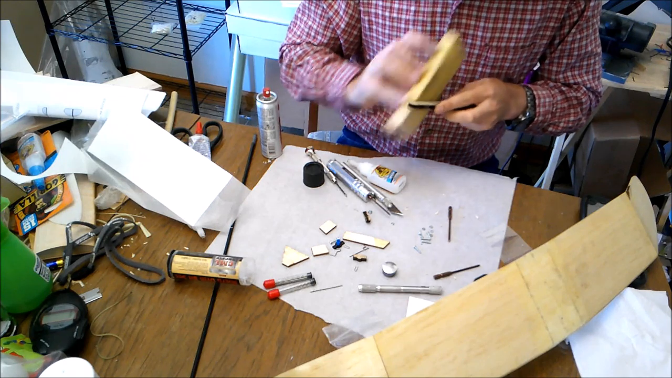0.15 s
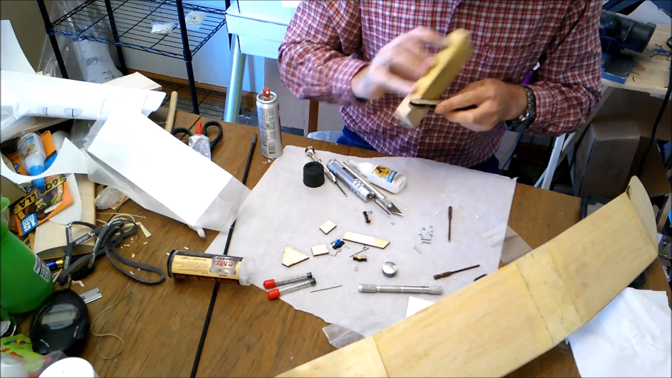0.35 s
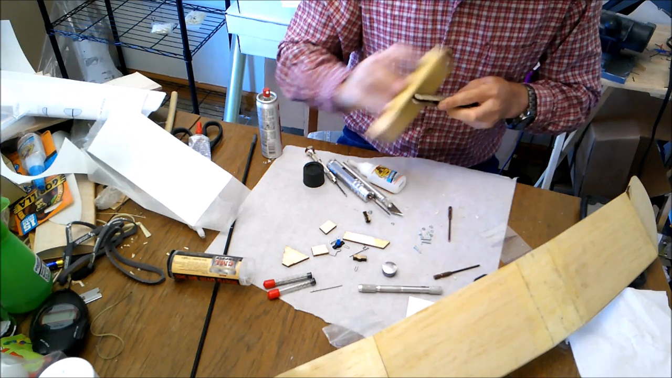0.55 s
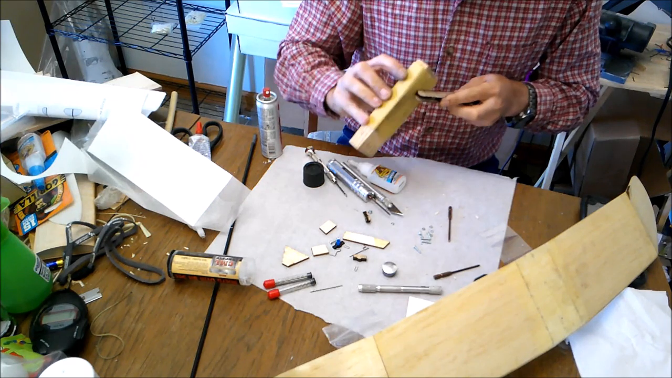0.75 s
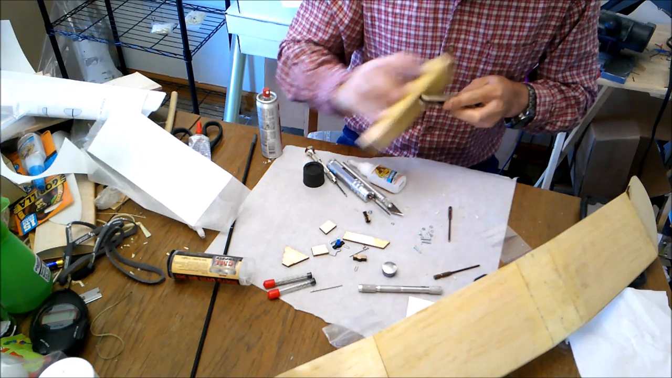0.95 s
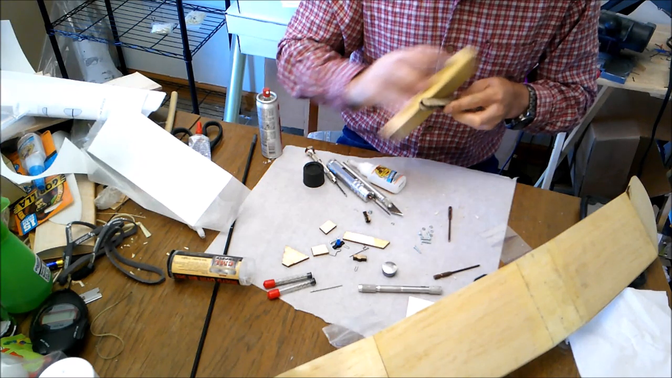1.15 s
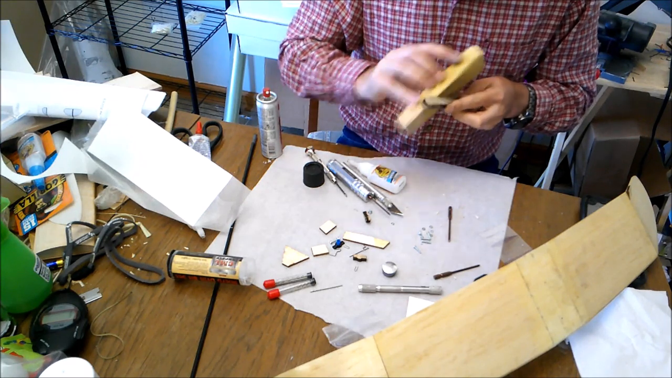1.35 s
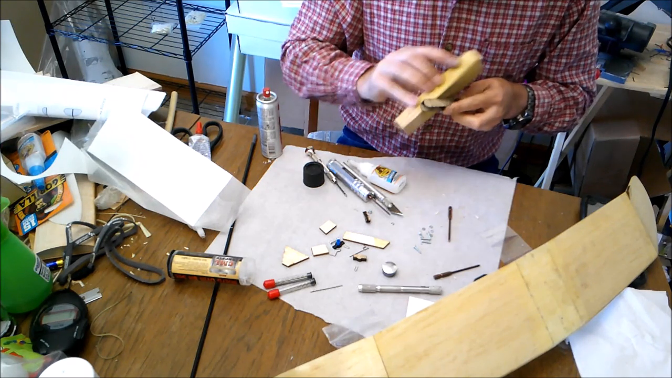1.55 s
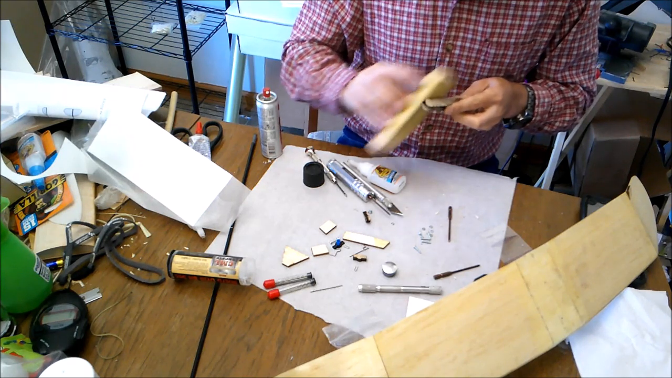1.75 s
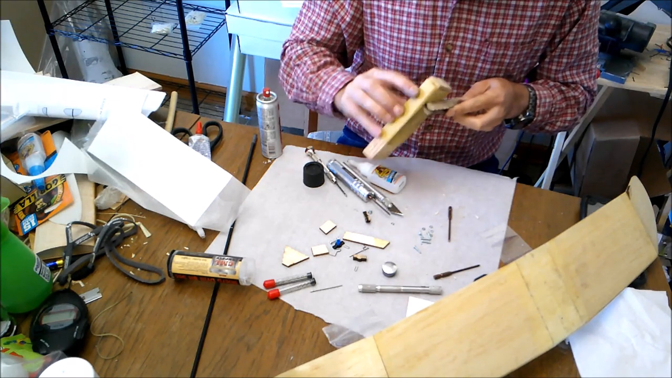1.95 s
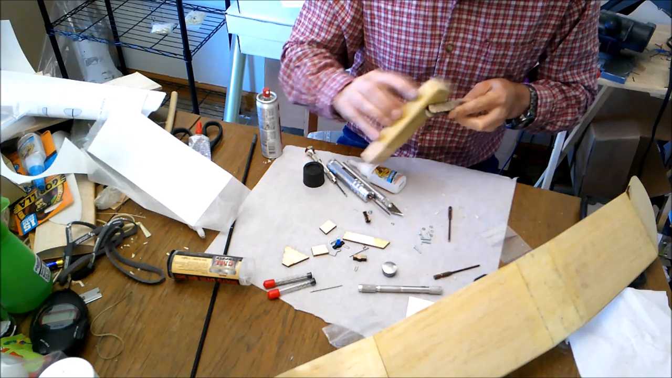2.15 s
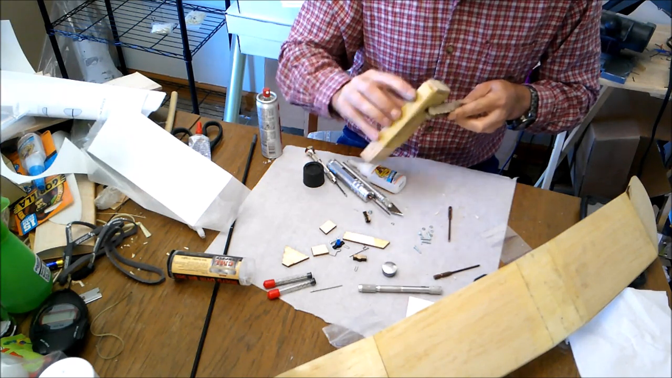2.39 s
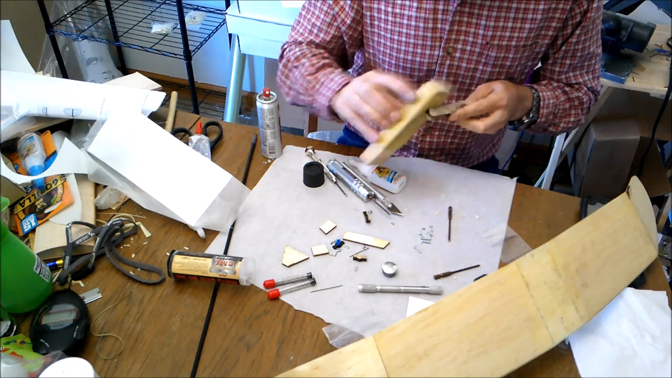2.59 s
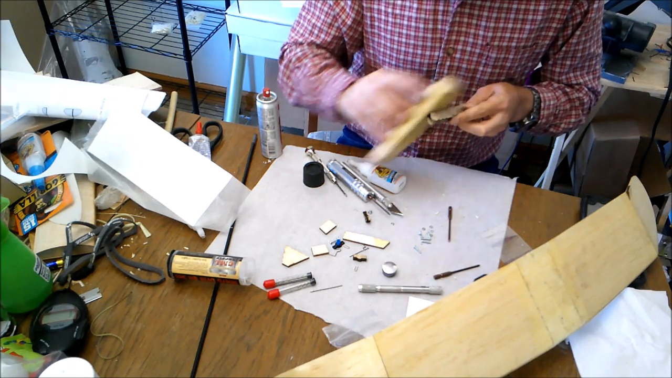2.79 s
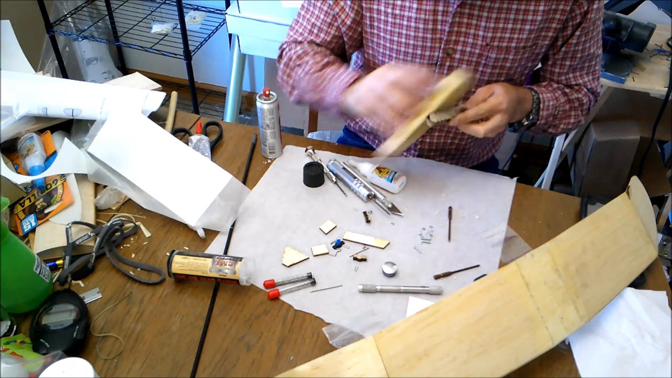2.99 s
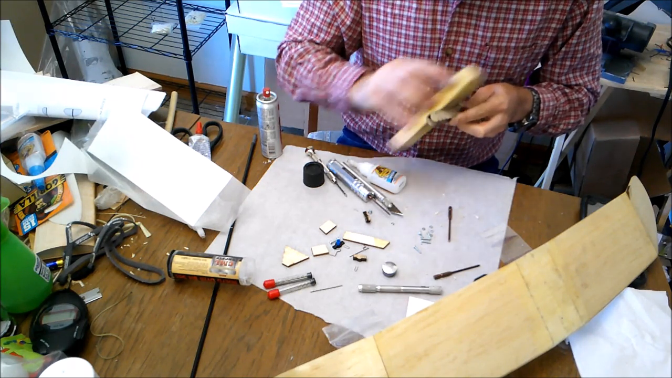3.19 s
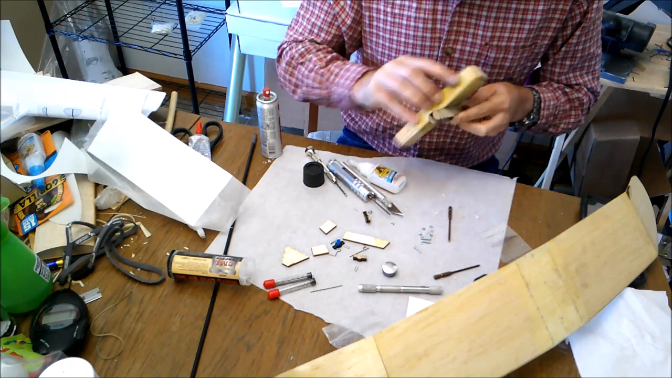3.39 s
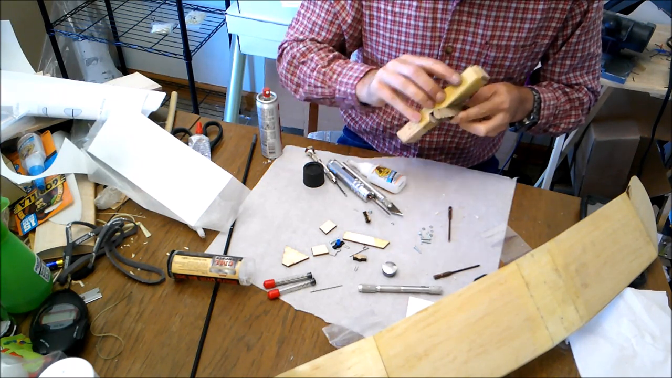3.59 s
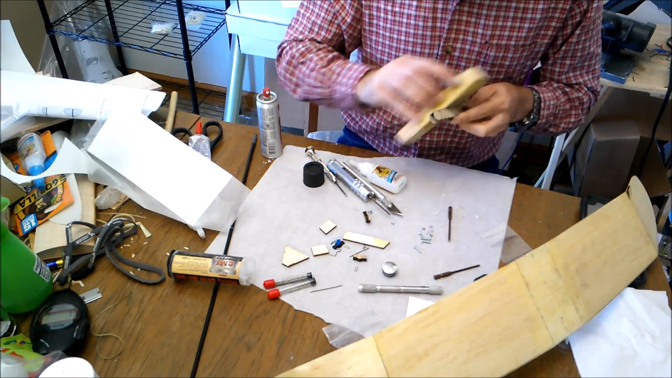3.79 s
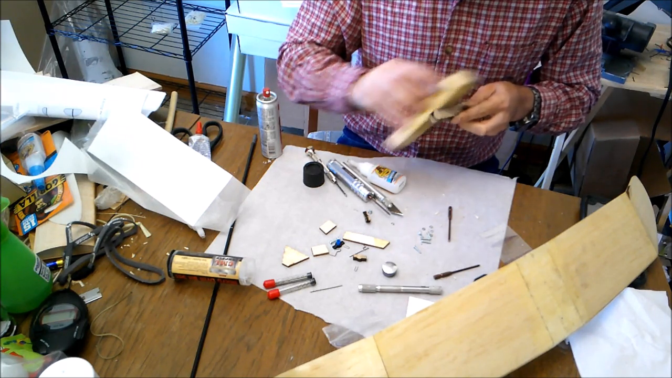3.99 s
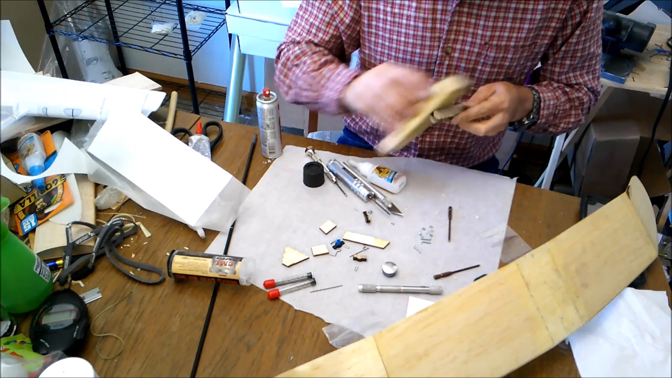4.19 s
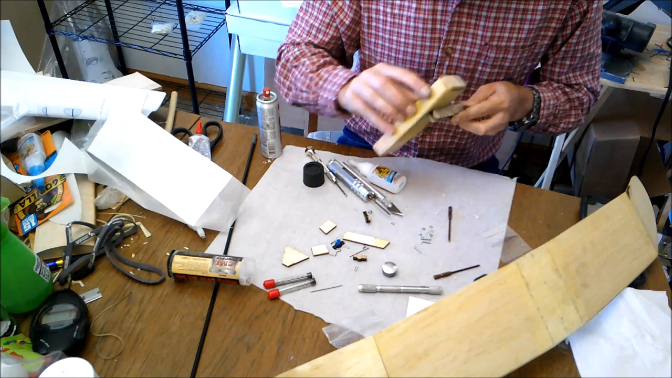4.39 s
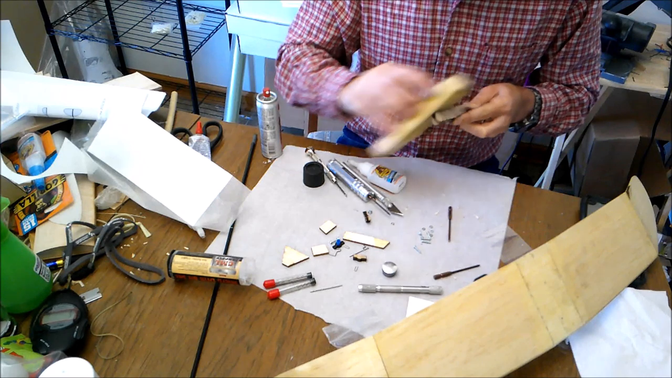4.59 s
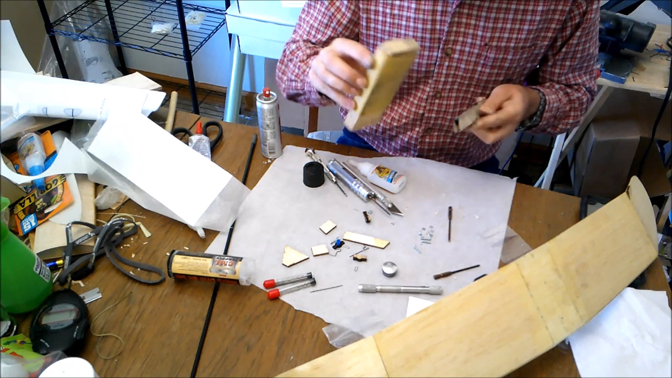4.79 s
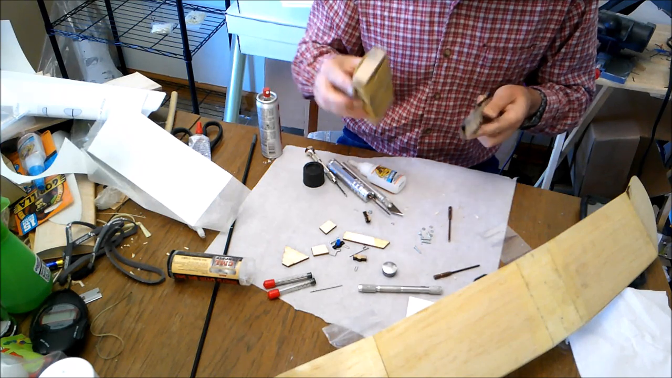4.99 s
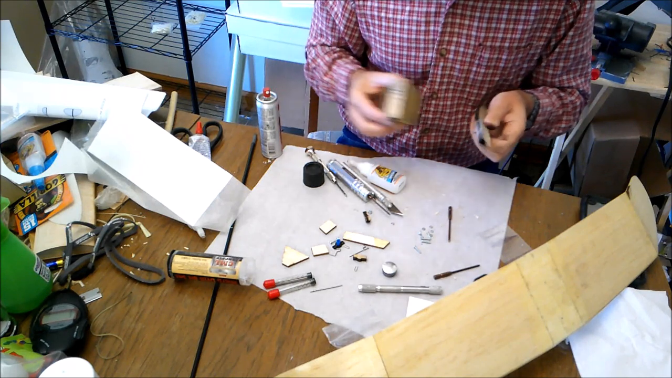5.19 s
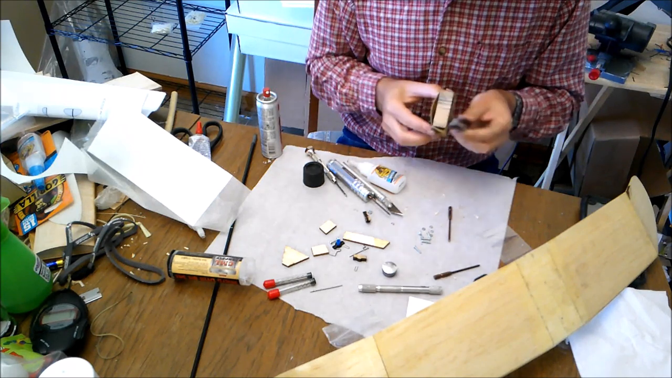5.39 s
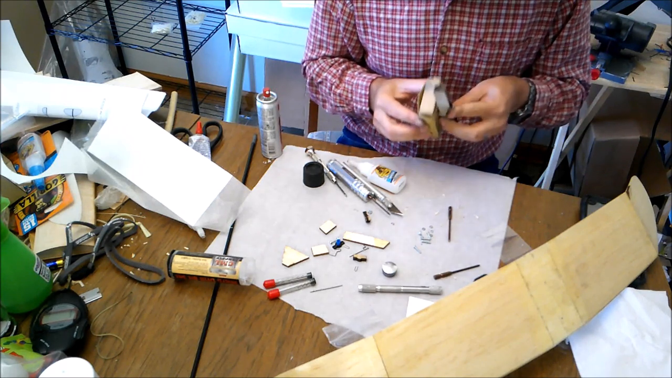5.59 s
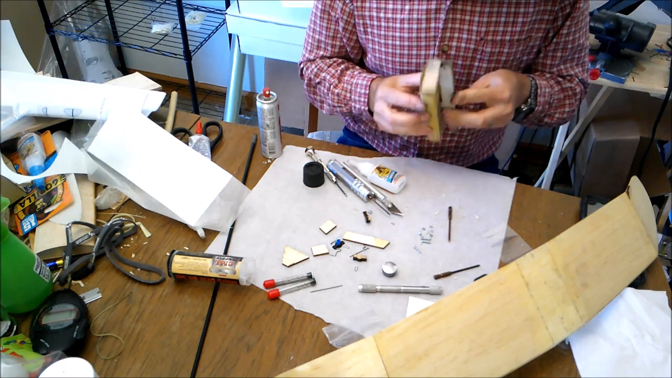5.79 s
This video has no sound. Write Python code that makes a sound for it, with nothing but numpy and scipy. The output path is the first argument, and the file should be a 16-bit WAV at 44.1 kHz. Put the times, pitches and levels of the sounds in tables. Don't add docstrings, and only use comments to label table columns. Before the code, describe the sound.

Fast dry sandpaper strokes rasp on a small wooden part for several seconds, then stop; light taps follow over faint room hum.

```python
import sys
import numpy as np
from scipy import signal
from scipy.fft import rfft, irfft, dct
from scipy.io import wavfile

SR = 44100
rng = np.random.default_rng(int(sys.argv[2]) if len(sys.argv) > 2 else 0)


def to_wav(s):
    ch = np.atleast_2d(s).T
    pcm = np.round(np.clip(ch, -1, 1) * 32767)
    wavfile.write(sys.argv[1], SR, pcm.astype(np.int16))


def natural_amplitude(level_db):
    exponent = np.asarray(level_db, float) / 20
    return 10 ** exponent


N = 257984
TIME = np.arange(N) / SR

# (start_s, length_s, pressure_db, lean_to_the_end_db, wood_body_db)
PUSHES = [(0.041, 0.08, -36.5, -0.5, -9.5), (0.293, 0.082, -38, -2.3, -7.5), (0.55, 0.083, -43, 1.5, -6),
          (0.8, 0.08, -39, -0.5, -7.5), (1.044, 0.074, -40, -0.8, -10.5), (1.275, 0.077, -42.5, 0.5, -5.5),
          (1.512, 0.067, -41, 1.2, -8.5), (1.738, 0.072, -43, -0.1, -5.5), (1.971, 0.066, -43.5, 0, -6.5),
          (2.19, 0.069, -42, -0.6, -7.5), (2.405, 0.068, -41, -1.4, -10), (2.624, 0.071, -42.5, -1.5, -7.7),
          (2.848, 0.071, -42.5, 0, -8), (3.06, 0.078, -44.5, -1, -7.2), (3.285, 0.065, -45.5, -2.2, -6.5),
          (3.507, 0.068, -44.5, -1, -8), (3.721, 0.076, -44.5, 0.5, -10.5),
          (3.949, 0.069, -44.5, -0.5, -9.5), (4.164, 0.08, -45.5, -1.5, -7.5), (4.4, 0.076, -48.5, 1, -8.5)]
# (start_s, length_s, pressure_db, lean_to_the_end_db, wood_body_db)
PULLS = [(0.168, 0.088, -42.5, -1.5, -4), (0.414, 0.09, -41.5, 2.5, -3.5), (0.681, 0.078, -42.5, 0, -7.5),
         (0.922, 0.084, -42.5, -1.5, -6.5), (1.162, 0.08, -44, -2, -8), (1.391, 0.076, -42, -0.9, -7),
         (1.622, 0.074, -41, -1, -7.2), (1.853, 0.075, -41.5, -1.5, -7.5), (2.079, 0.069, -42.5, 1, -7.5),
         (2.29, 0.082, -44, -1.8, -8), (2.51, 0.072, -42.5, -1.3, -7.5), (2.731, 0.072, -44, -1.9, -5.5),
         (2.953, 0.07, -44, -0.3, -8), (3.17, 0.076, -44.5, -0.5, -8), (3.388, 0.074, -46, 0.5, -6),
         (3.612, 0.073, -47.5, -0.5, -4.5), (3.832, 0.078, -45, 0.5, -7.5), (4.057, 0.075, -45.5, -3, -5),
         (4.275, 0.082, -49.5, -0.2, -5), (4.53, 0.098, -48.5, -1, -6)]
# (start_s, length_s, pressure_db, grit_fizz_db, wood_body_db)
TOUCHES = [
    (-.08, 0.1, -54, -1, -1.5),
    (5.38, 0.038, -62, -10.5, -9),
    (5.427, 0.038, -60, -8, -11),
    (5.481, 0.085, -56.5, -12, -14),
    (5.589, 0.016, -55, -22, 1.5),
    (5.625, .031, -63, -11, -7),
    (5.8, .1, -51, -13, -12),
]


def grit():
    # (pitch_hz, width_hz, level_over_rub_db)
    block_modes = [
        (634.5, 7.6, -12),
        (900, 22, -8),
        (1270, 89, -5),
        (1923, 530, 4),
        (2210, 190, -0.5),
        (2632, 110, -1.5),
        (2943, 250, 7.5),
        (3670, 710, -6.5),
        (5150, 440, -6.5),
        (6550, 660, -11),
    ]
    # (time_s, ring_db, ring_centre_hz, share_of_glide)
    grip = [(0, 6, 2440, -.6), (.45, 7, 2505, -0.71), (.6, 5.5, 2710, -0.16), (1, -2.5, 2700, .2),
            (1.4, -5.5, 2590, .3), (2, 5, 2790, .5), (2.4, 0, 2560, 0.94), (3.3, 1.5, 2750, 0.98),
            (3.8, 3, 2585, 1), (4.6, -3, 2640, 0.52), (5.4, 2.5, 2680, 0.38)]
    # (time_s, level_db, share_of_pitch)
    fingers = [(0, -0.5, 0.92), (.5, -4, 1.1), (1, 2, 0.84), (1.45, 0.5, 0.97), (1.85, 4, 0.89),
               (2.4, 3.5, 0.97), (2.9, 0.5, 1.05), (3.5, -1.5, 1.05), (3.85, 5.5, 1.15), (4.1, 2, 1.15),
               (4.6, 0, 1.05), (5.4, -1, 1.1)]

    coarse = ticks(per_s=9000, spread_db=2.0, chatter_db=-0.03, clump_db=0.96)
    dust = ticks(per_s=7700, spread_db=-1.0, chatter_db=-1.3, clump_db=1.5)
    hz = np.fft.rfftfreq(N, 1 / SR)
    dust_share = 1 / (1 + (5700 / (hz + 1)) ** 12)
    rub = irfft(rfft(coarse) * (1 - dust_share) + rfft(dust) * dust_share, N)

    rings = np.zeros(N)
    for mode_hz, width_hz, level_db in block_modes:
        drifting_hz = mode_hz * (1 + 0.008 * wander(2))
        rings += natural_amplitude(level_db + 2.6 * wander(3.4)) * resonate(rub, drifting_hz, width_hz)

    # (start_hz, end_hz, start_db, end_db)
    ring_hz, ring_db = glide(push=(2193, 2900, 4.6, 0.6), pull=(2885.5, 2555, 3, 5), touch=(2500, 2000, 4, 2.9))
    ring_hz = curve(grip, column=2) + curve(grip, column=3) * (ring_hz - 2630)
    ring_db = ring_db + curve(grip, column=1)
    low_hz, low_db = glide(push=(903, 1480, 1.4, 1), pull=(1417, 1195.5, 2.5, -7), touch=(1000, 1300, 1, 1))
    low_hz = low_hz * curve(fingers, column=2)
    low_db = low_db + curve(fingers, column=1)
    piece = resonate(resonate(rub, ring_hz, 650), ring_hz, 650)
    block = resonate(resonate(rub, low_hz, 550), low_hz, 550)
    return split_layers(rub + rings + natural_amplitude(ring_db) * piece + natural_amplitude(low_db) * block)


def ticks(per_s, spread_db, chatter_db, clump_db):
    # (pitch_hz, level_db)
    rub_colour = [(150, -49.5), (250, -30), (400, -19), (620, -8), (1000, -11), (1500, -8.5), (2200, -5),
                  (3050, -3.5), (3450, -4.5), (4100, -11), (4900, -22), (5900, -14.5), (7000, -11),
                  (7700, -17.5), (8300, -37.5)]
    hits = rng.choice([-1., 1.], N) * (rng.random(N) < per_s / SR)
    size_db = spread_db * np.minimum(rng.exponential(1, N), 3)
    hits *= natural_amplitude(size_db + chatter_db * wander(60) + clump_db * wander(12))
    return colour(hits, rub_colour)


def glide(push, pull, touch):
    knots = []
    for table, (start_hz, end_hz, start_db, end_db) in ((PUSHES, push), (PULLS, pull), (TOUCHES, touch)):
        for start, length, *rest in table:
            knots += [(start, start_hz, start_db), (start + length, end_hz, end_db)]
    knots.sort()
    ring_hz = curve(knots, column=1) * (1 + 0.06 * wander(7.1))
    ring_db = curve(knots, column=2) + 2.5 * wander(27)
    return ring_hz, ring_db


def split_layers(x):
    spec, hz = rfft(x), np.fft.rfftfreq(len(x), 1 / SR)
    body = 1 / (1 + (hz / 1700) ** 8)
    fizz = 1 / (1 + (4500 / (hz + 1)) ** 10)
    catch = np.exp(-((hz - 1800) / 500) ** 2)
    return [evened(irfft(spec * share, len(x))) for share in (body, 1 - body - fizz, fizz, catch)]


def motion():
    rise_s, fall_s = 0.037, 0.036
    start_at, end_at = 0.33, 0.3
    catch_db, catch_s = -8, 0.0097
    gains = np.zeros((4, N))
    for start, end, db, body_db, fizz_db, lean_db in strokes():
        span = slice(max(round((start - 0.04) * SR), 0), round((end + 0.05) * SR))
        t = TIME[span]
        late = natural_amplitude(0.2 * np.clip(lean_db, -4, 4))
        up = np.clip((t - start) / (rise_s * late) + start_at, 0, 1)
        down = np.clip((end - t) * late / fall_s + end_at, 0, 1)
        speed = np.sin(np.pi / 2 * up) * np.sin(np.pi / 2 * down)
        since = np.maximum(t - start + 0.0026, 0) / catch_s
        catch = natural_amplitude(catch_db) / late * np.minimum(7.3 * since, 1) * np.exp(-since)
        lean = natural_amplitude(lean_db * (2 * (t - start) / (end - start) - 1))
        body = natural_amplitude(body_db) * speed ** 0.56 * lean ** 0.58
        fizz = natural_amplitude(fizz_db) * speed ** 1.13 * lean ** 1.1
        gains[:, span] += natural_amplitude(db + 1.0) * np.array([body, speed * lean, fizz, catch])
    uneven_db = [1.6 * wander(14), 0.92 * wander(27), 1.4 * wander(20), 2.9 * wander(3.2)]
    return gains * natural_amplitude(uneven_db)


def strokes():
    rows = []
    for start, length, db, lean_db, body_db in PUSHES + PULLS:
        fizz_db = -8.5 - 0.56 * (db + 43.5)
        rows.append((start, start + length, db, body_db, fizz_db, lean_db))
    for start, length, db, fizz_db, body_db in TOUCHES:
        rows.append((start, start + length, db, body_db, fizz_db, 0))
    return rows


def groans():
    # (start_s, end_s, level_db, pitch_hz)
    scrapes = [
        (0.098, 0.107, -46, 565),
        (0.204, 0.25, -62, 590),
        (0.341, 0.362, -47, 534),
        (0.407, 0.468, -54, 466),
    ]
    noise, out = rng.standard_normal(N), np.zeros(N)
    for start, end, db, hz in scrapes:
        swell = np.sin(np.pi * np.clip((TIME - start) / (end - start), 0, 1))
        out += natural_amplitude(db) * swell * evened(resonate(resonate(noise, hz, 290), hz, 290))
    return out


def taps():
    # (start_s, peak_db, time_to_fall_60_db_s, low_knock_db, high_tick_db)
    touches_down = [
        (4.7998, -45, 0.018, 6, -10),
        (5.3794, -50, 0.012, 4, -8),
        (5.452, -50, 0.012, -6, 14),
        (5.7825, -33, 0.015, 4, -11),
    ]
    # (pitch_hz, level_db, share_of_fall_time)
    tones = [
        (1290, -5.5, 0.75),
        (2440, -2.5, 0.45),
        (3550, -11, 0.94),
        (6460, -5, 0.76),
    ]
    out, t = np.zeros(N + 4000), np.arange(4000) / SR
    for start, db, t60, low_db, high_db in touches_down:
        tilts_db = (low_db, low_db / 2, 0, high_db)
        ring = np.zeros(len(t))
        for (hz, tone_db, share), tilt_db in zip(tones, tilts_db):
            ring += natural_amplitude(tone_db + tilt_db - 60 * t / (t60 * share)) * np.sin(2 * np.pi * hz * t)
        ring *= 1 - np.exp(-t / 0.00022)
        out[round(start * SR):][:4000] += natural_amplitude(db) * ring / abs(ring).max()
    return out[:N]


def thumps():
    # (start_s, level_db, pitch_hz)
    nudges = [
        (5.505, -43, 22.3),
        (5.37, -52, 40),
    ]
    out = np.zeros(N)
    for start, db, hz in nudges:
        turns = np.clip((TIME - start) * hz, 0, 1.5)
        out -= natural_amplitude(db) * np.sin(2 * np.pi * turns) * np.sin(np.pi * turns / 1.5)
    return out


def room(x):
    # (pitch_hz, time_to_fall_60_db_s)
    fall_times = [
        (300, 0.73),
        (1500, 0.31),
        (4000, 0.22),
        (8000, 0.35),
    ]
    noise = rng.standard_normal(SR // 2) * (np.arange(SR // 2) > 250)
    hz, t, z = signal.stft(noise, SR, nperseg=256)
    fading = z * natural_amplitude(-60 * t / read(fall_times, hz)[:, None])
    tail = signal.istft(fading, SR, nperseg=256)[1]
    return signal.oaconvolve(x, tail / np.linalg.norm(tail))[:N]


def air():
    # (pitch_hz, level_db)
    wash_colour = [(82, -40), (140, -10), (230, -10), (350, -10), (450, -14), (1070, -10), (2000, -18),
                   (3000, -22.5), (3700, -32), (5000, -48), (6200, -37.5), (7350, -29), (7900, -46.5),
                   (8400, -64)]
    # (time_s, hum_db, fan_tone_db)
    load = [(0.0, -67.5, -66), (0.33, -60, -83), (0.34, -62, -78.5), (2.74, -61, -73.5), (3.19, -72.5, -79),
            (3.22, -66.5, -66), (3.58, -65.5, -78), (3.71, -68, -69), (4.54, -63, -75), (5.36, -63.5, -56),
            (5.41, -57, -85), (5.7, -60, -62), (5.75, -68, -80), (5.85, -61, -69)]
    # (pitch_hz, width_hz, level_db)
    moans = [
        (64.4, 25, -64.5),
        (81, 25, -67),
        (297.8, 15, -80),
        (429, 4.7, -78),
    ]
    wash = natural_amplitude(-58.5 + 0.5 * wander(3.1)) * evened(colour(rng.standard_normal(N), wash_colour))
    rumble = natural_amplitude(-56.5 + 1.3 * wander(3)) * evened(resonate(moan(22, 40), 22, 40))
    mains = np.sqrt(2) * sine(119.5 + 1.67 * wander(8.1))
    hum = natural_amplitude(curve(load, column=1) + 0.8 + 2.5 * wander(5)) * evened(mains + 0.58 * moan(134, 17))
    tone = natural_amplitude(curve(load, column=2) - 2.5 + 1.8 * wander(4.6)) * sine(224 + 3.0 * wander(4.2))
    return wash + rumble + hum + tone + sum(natural_amplitude(db) * moan(hz, width) for hz, width, db in moans)


def moan(hz, width):
    return evened(resonate(rng.standard_normal(N), hz, width))


def sine(hz):
    return np.sin(2 * np.pi * np.cumsum(hz) / SR)


def evened(x):
    return x / np.sqrt(np.mean(x ** 2) + 1e-20)


def curve(table, column):
    rows = np.transpose(table)
    return np.interp(TIME, rows[0], rows[column])


def read(points, hz):
    f, value = np.transpose(points)
    return np.interp(np.log(hz + 1), np.log(f + 1), value)


def colour(x, points):
    level_db = np.maximum(read(points, abs(np.fft.fftfreq(8192, 1 / SR))), -100)
    log_gain = np.log(natural_amplitude(level_db))
    response = np.fft.ifft(np.exp(np.conj(signal.hilbert(log_gain)))).real[:4096]
    return signal.oaconvolve(x, response)[:len(x)]


def resonate(x, hz, width):
    turn = np.exp(2j * np.pi * np.cumsum(hz * np.ones(len(x))) / SR)
    r = np.exp(-np.pi * width / SR)
    return 2 * (turn * signal.lfilter([1 - r], [1, -r], x / turn)).real


def wander(per_s):
    knots = rng.standard_normal(int(N / SR * 200) + 9)
    smooth = signal.lfilter([1], [1, -np.exp(-per_s / 30)], knots)
    return np.interp(TIME * 200, np.arange(len(smooth)), evened(smooth))


def scene():
    layers = grit()
    hands = (motion() * layers).sum(0) + groans() + taps()
    mono = hands + natural_amplitude(-9.5) * room(hands) + air() + thumps()
    return np.array([mono, mono])


def starve(x):
    # (centre_s, step_under_the_top_db)
    moments = [(.3, 3.5), (2.968, 4.5), (3.181, 3.5), (3.25, 6), (3.782, 3), (3.846, 3), (3.864, 3.5),
               (3.93, 16), (4.077, 3.5), (4.74, 11), (4.975, 11), (5.505, 5), (5.593, 14)]
    size = 1664
    out, window = x.copy(), np.sin(np.pi * (np.arange(size) + 0.5) / size)
    hearing_db = [(150, 4), (400, 0), (3000, 0), (5000, 5), (7000, 7)]  # (Hz, dB)
    hearing = natural_amplitude(read(hearing_db, np.arange(size) * SR / 2 / size))
    for centre, step_db in moments:
        span = slice(round(centre * SR) - size // 2, round(centre * SR) + size // 2)
        lines = dct(x[span] * window, 4)
        step = natural_amplitude(-step_db) * abs(lines * hearing)[20:].max() / hearing
        change = step * np.round(lines / step) - lines
        out[span] += window * dct(change, 4) / (2 * size)
    return out


def band_limit(x):
    return signal.sosfilt(signal.butter(12, 8150, fs=SR, output="sos"), x)


def record(dry):
    low_pass = signal.firwin(501, 8130, window=("kaiser", 9), fs=SR)
    narrow = signal.oaconvolve(dry[0], low_pass, "same")
    mono = starve(narrow)
    return band_limit(np.array([mono, mono]))


dry = scene()
out = record(dry)
to_wav(out)
```